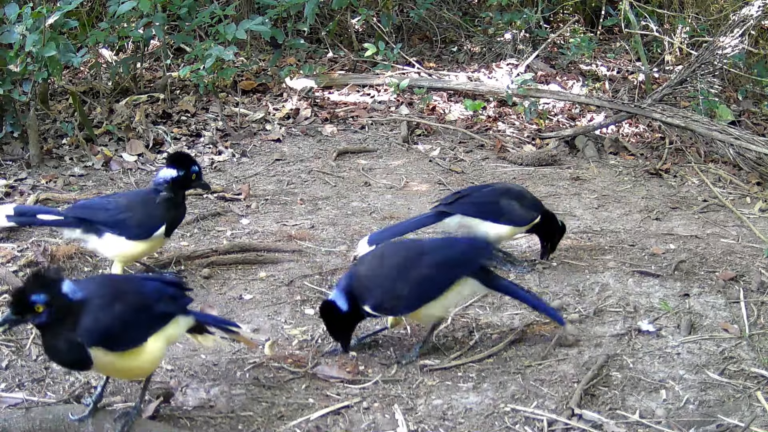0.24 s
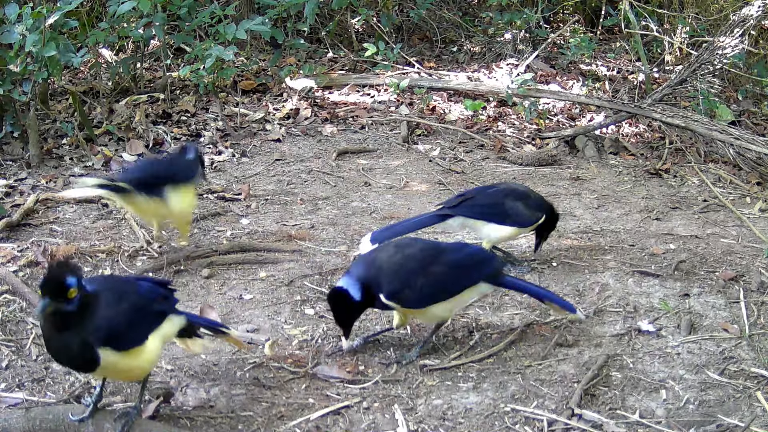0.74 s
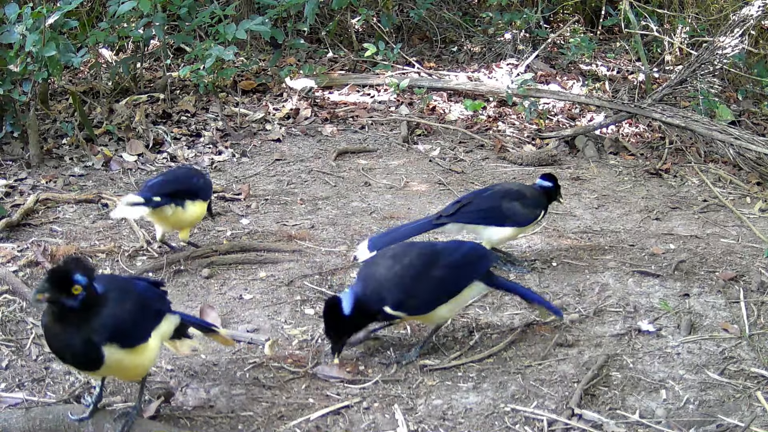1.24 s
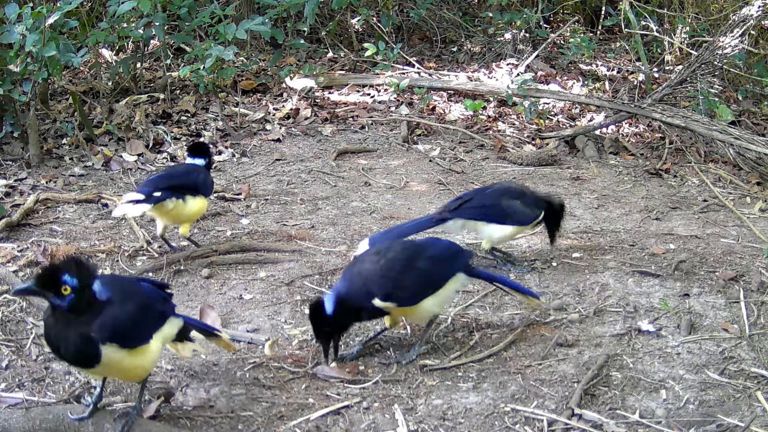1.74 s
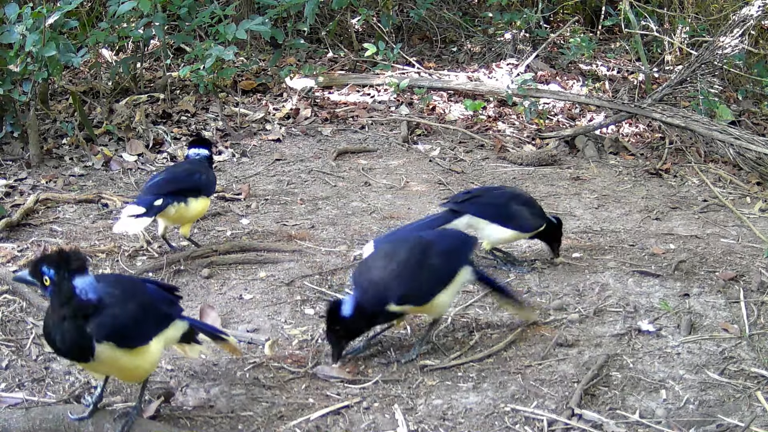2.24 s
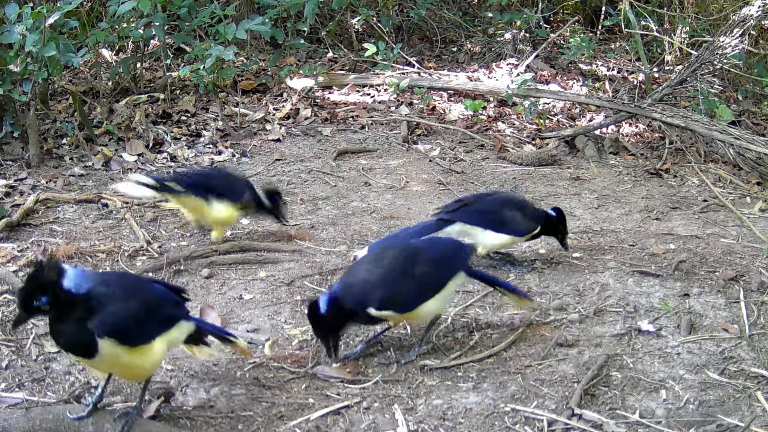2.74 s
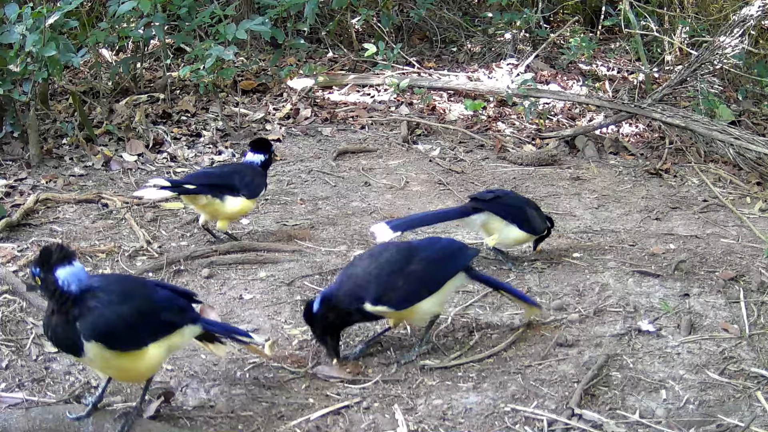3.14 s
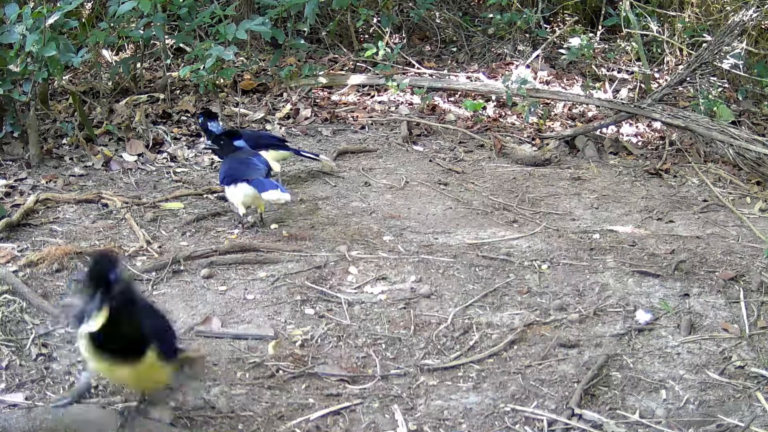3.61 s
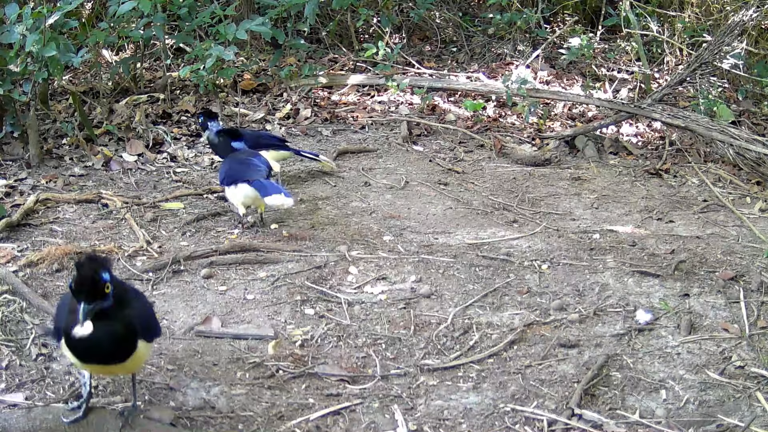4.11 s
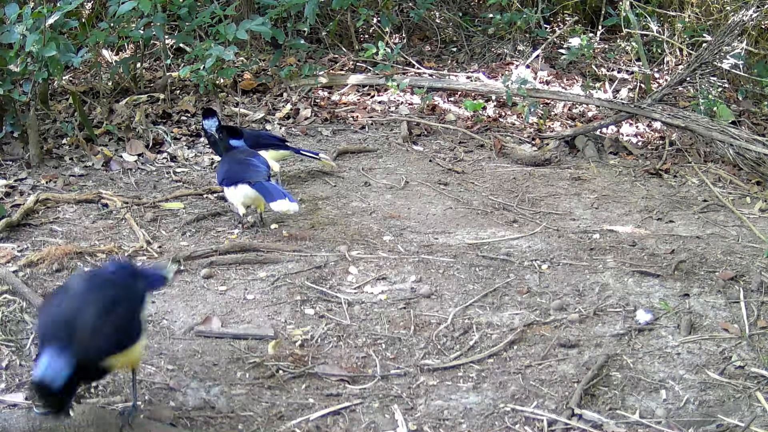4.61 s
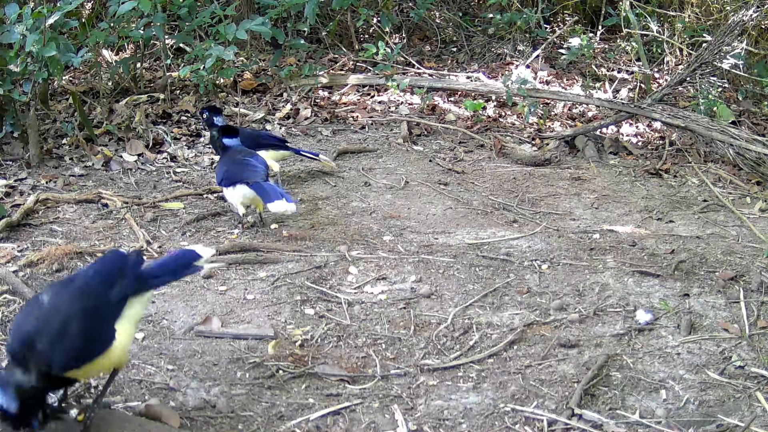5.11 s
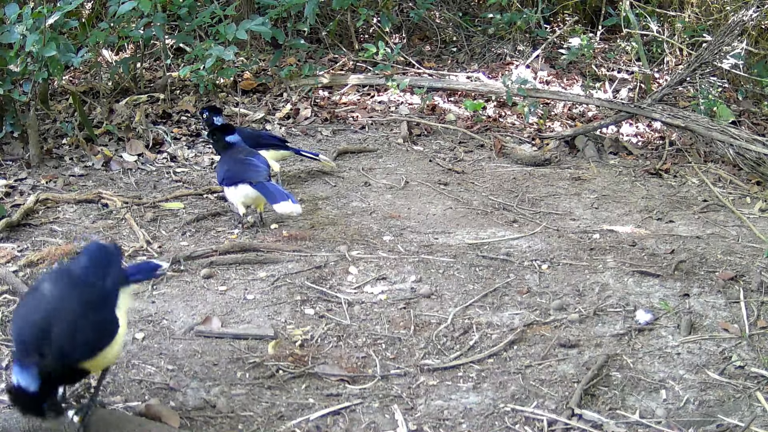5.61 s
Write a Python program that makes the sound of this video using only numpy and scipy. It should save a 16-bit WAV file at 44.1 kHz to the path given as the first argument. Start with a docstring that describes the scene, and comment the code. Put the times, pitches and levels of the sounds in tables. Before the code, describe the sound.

Two brief bursts of abrupt jay chips and downward-sliding notes ring in a quiet wood, with light pecking and leaf rustle between.

```python
"""First a sharp chip, already under way, from a jay close to the microphone, over a low rumble and still
forest air. Each chip is two gliding, coupled voices; the same near perspective has one long falling note.
Further off, behind leaves, a bird gives four stepped falling notes; two pairs of thin whistles are bent tones.
Jays forage on bare ground: noise bursts tick, damped modes knock, and sparse crackles rustle.
A small recorder takes it all at 16 kHz and joins its samples by straight lines."""
import sys
import numpy as np
from scipy import signal
from scipy.fft import rfft, irfft
from scipy.io import wavfile

SR = 44100
rng = np.random.default_rng(int(sys.argv[2]) if len(sys.argv) > 2 else 0)


def transcribe(signal):
    """Save signal, clipped to [-1, 1], as a 16-bit WAV file at the path in sys.argv[1]."""
    frames = np.atleast_2d(signal).T
    limited = np.clip(frames, -1, 1)
    pcm = np.round(limited * 32767).astype(np.int16)
    wavfile.write(sys.argv[1], SR, pcm)


N = 258271

# Chips of the near jay. Each row: start in seconds, time until the dive in seconds, upper voice in Hz,
# its peak in dB, its level in the dive in dB, lower voice in Hz, its peak in dB, its fade before the
# release in dB, relative overtone level in dB, echo off a trunk in dB relative to the chip.
CHIP_CALLS = [(-0.016, 0.02, 2808, -29, -31, 1800, -31.5, 18, 0, -7),
              (0.119, 0.02, 3474, -21, -39, 1772, -25, 9, 1, -25),
              (2.963, 0.022, 3330, -28.5, -34.5, 1820, -32, 15, 4.5, -5),
              (3.075, .0195, 3046, -28.5, -32.5, 1787, -27, 31, 5, -6),
              (3.204, .019, 2932, -29.5, -36.5, 1710, -34, 17, 4, -15)]
# The near falling note. Each row: time in seconds, pitch in Hz, relative level in dB.
NEAR_FALL = [(3.812, 6690, -60.5), (3.816, 4455, -40), (3.82, 3970, -26.5), (3.842, 2736, -18),
             (3.853, 2437, -22), (3.875, 2145, -29.5), (3.909, 1897, -22), (3.926, 1565, -20.5),
             (3.936, 1232, -24.5), (3.953, 1017, -24.5), (3.98, 860, -37.5), (3.99, 530, -48.5),
             (4.0, 330, -54)]
# Distant falling notes. Each row: start in seconds, length in seconds, level in dB, entry pitch in Hz,
# first, second and third step in Hz, relative echo level in dB, extra treble in the echoes in dB.
FAR_FALLS = [(0.611, 0.1312, -37, 4600, 3450, 2300, 1480, -0.87, 12),
             (0.879, 0.13, -37.5, 4605, 3570, 2150, 1422, -.5, 13),
             (3.177, .127, -37.5, 3990, 3450, 2228, 1483, 1, 18),
             (3.45, 0.12, -37.5, 4895, 3004, 2130, 1575, 0, 12.8)]
# Thin whistles, in overlapping pairs. Each row: start in seconds, length in seconds, first pitch in Hz,
# turning pitch in Hz, turn as a share of the length, relative level in dB, growth over the length in dB.
WHISTLE_ARCS = [(0.311, 0.097, 7380, 6400, 0.55, -76, 7), (0.323, 0.068, 6970, 7940, 0.68, -75.5, 19),
                (4.693, 0.079, 7900, 6100, 1, -73.5, -4), (4.708, 0.073, 7250, 7900, 1, -80, -3)]
# Pecks and snapping litter. Each row: start in seconds, relative body level in dB, body centre in Hz,
# relative level of the crisp top in dB.
LITTER_TICKS = [(0.9836, -46, 1430, -61), (1.3096, -53, 1454, -75), (1.3783, -46.5, 1845, -91),
                (1.9333, -47.5, 1590, -70), (2.4895, -46, 2250, -87), (2.6096, -45, 1830, -74),
                (3.6905, -49.5, 1670, -83.5), (4.13, -45, 1881, -71.5), (4.2228, -42, 1712, -62.5),
                (4.5552, -51, 1390, -84), (4.7836, -50.5, 1410, -73), (4.814, -44, 2300, -70.5),
                (4.9004, -53, 1880, -68), (4.9371, -53, 1206, -83.5), (4.9757, -47.5, 2046, -67),
                (5.034, -46.5, 1390, -74), (5.682, -52, 2600, -75)]
# Dull knocks on the ground. Each row: start in seconds, relative level in dB, brightness of the modes
# above 1 kHz in dB, relative scrape level in dB.
GROUND_KNOCKS = [(.881, -46, -17, 1.5), (2.207, -43, 3.5, 2.5)]
# Modes a knock rings with. Each row: frequency in Hz, relative level in dB, time to fall 60 dB in seconds.
GROUND_MODES = [(561, 3.5, 0.043), (940, -16, 0.14), (1210, -1, 0.025), (1820, -43, 0.049),
                (2040, -10, 0.05), (2309, -6, 0.036)]
# Spectrum of the still forest air. Each row: frequency in Hz, relative density in dB per Hz.
AIR_SPECTRUM = [(88, -31), (150, -4), (166, -5.5), (202, 0), (227, -5), (385, -8.5), (536, -10),
                (1070, -14.5), (1220, -14.5), (1440, -16), (1980, -18.5), (3090, -25.5), (4830, -40.5),
                (7800, -31.5), (10100, -68), (17200, -120)]
# Spectrum of the low rumble. Each row: frequency in Hz, relative density in dB per Hz.
RUMBLE_SPECTRUM = [(7.1, -29.5), (12, 5), (30, 0.5), (65, -2), (84, -3), (160, -16.5), (210, -55),
                   (350, -120)]
# Ring of the trees. Each row: frequency in Hz, time to fall 60 dB in seconds.
FOREST_RING = [(400, .4), (1000, 0.27), (1600, 0.65), (2300, 0.59), (3500, 0.46), (5000, 0.66), (8000, 1)]
# How throat and open beak colour overtones and air noise. Each row: frequency in Hz, gain in dB.
THROAT_GAIN = [(1500, -4.5), (2700, 0), (3800, -5.5), (5000, -8), (6300, -3.5), (7100, -3), (7900, 1)]
# The four steps of a distant note, in order. Each entry: level of the step in dB relative to the note.
FALL_STEP_DB = [-15, -2, -1.5, -11.5]

AIR_DB, RUMBLE_DB = -62, -50
# sampling rate of the recorder, and the edge of its output filter
RECORDER_HZ, EDGE_HZ = 16000, 15700
LEAD_S = .02  # room for the chip that starts before time zero

# upper voice of a chip: pitch at the break, floor it dives toward, length and time constant of the dive
BREAK_HZ, FLOOR_HZ, DIVE_S, DIVE_TIME_CONSTANT_S = 2355, 375, 0.022, .0084
SAG_POWER, SWELL_DB, SWELL_POWER = 1.7, 44, 2.52
SOFTEN_S, RELEASE_DB = 0.0091, 20.5
# lower voice of a chip: attack, and the share of its pitch that it loses
LOWER_ATTACK_S, LOWER_SAG = .007, 0.33
# the upper voice is damped while it passes through the pitch of the lower
CROSSING_DB, CROSSING_WIDTH_HZ = 3, 340

# distant notes: travel before the first and after the last step, in steps, and how they linger and dip
STEPS_BEFORE, STEPS_AFTER, SLOWING, LINGER, DIP_DB = .37, .33, .8, 0.48, 13
SETTLE_STEPS, ENTRY_DB = 1.5, -17
LAST_STEP_HZ, EXIT_HZ = 860, 520


def amp(db):
    """Decibels to gain."""
    return 10 ** (np.asarray(db) / 20)


def unit(x):
    """Scales to rms 1."""
    return x / np.sqrt(np.mean(x ** 2) + 1e-20)


def read(points, hz):
    """Reads a table along a log-frequency axis."""
    f, value = np.transpose(points)
    return np.interp(np.log(hz + 1), np.log(f), value)


def add(mix, s, sound):
    """Adds a sound to the mix at time s, or at the start if s is negative."""
    part = mix[max(round(s * SR), 0):][:len(sound)]
    part += sound[:len(part)]


def play(sounds):
    """Lays (start, sound) pairs on one track."""
    track = np.zeros(N)
    for start, sound in sounds:
        add(track, start, sound)
    return track


def shaped_noise(size, gain):
    """White noise filtered by a gain for each frequency bin, at rms 1."""
    return unit(irfft(rfft(rng.standard_normal(size)) * gain, size))


def band_noise(size, hz, width_hz):
    """Noise of rms 1 in a bell-shaped band; around 0 Hz it is a slow random waver."""
    f = np.fft.rfftfreq(size, 1 / SR)
    return shaped_noise(size, np.exp(-((f - hz) / width_hz) ** 2))


def air_noise(size):
    """Turbulence in the syrinx, coloured by the throat."""
    hz = np.fft.rfftfreq(size, 1 / SR)
    return shaped_noise(size, amp(read(THROAT_GAIN, hz)) * (hz < RECORDER_HZ / 2))


def voice(hz, db, jitter, flutter_db):
    """One vibrating side of the syrinx: its phase and its slightly unsteady strength."""
    size = len(hz)
    unsteady_hz = hz * (1 + jitter * band_noise(size, 0, 500))
    phase = 2 * np.pi * np.cumsum(unsteady_hz) / SR
    strength = amp(db + flutter_db * band_noise(size, 0, 189))
    # about 1 ms of fade at each end
    return phase, strength * signal.windows.tukey(size, min(0.00223 * SR / size, 1))


def upper_voice(t, hold_s, top_hz, peak_db, dive_db):
    """Pitch and level of a chip's upper voice: it swells and sags, then breaks into a softer dive."""
    held, diving_s = np.minimum(t / hold_s, 1), np.maximum(t - hold_s, 0)
    sagging_hz = top_hz + (BREAK_HZ - top_hz) * held ** SAG_POWER
    hz = FLOOR_HZ + (sagging_hz - FLOOR_HZ) * np.exp(-diving_s / DIVE_TIME_CONSTANT_S)
    sustain_db = dive_db + (peak_db - dive_db) * np.exp(-(diving_s / SOFTEN_S) ** 2)
    swell_db = -SWELL_DB * (1 - held) ** SWELL_POWER
    release_db = -RELEASE_DB * (diving_s / DIVE_S) ** 3
    return hz, sustain_db + swell_db + release_db


def lower_voice(t, top_hz, peak_db, fade_db):
    """Pitch and level of a chip's lower voice: a quick attack, then both droop."""
    droop = (t / t[-1]) ** 2
    attack_db = 20 * np.log10(np.clip(t / LOWER_ATTACK_S, 1e-3, 1))
    level_db = peak_db + attack_db - fade_db * droop - RELEASE_DB * droop ** 4
    return top_hz * (1 - LOWER_SAG * droop), level_db


def chip(row, sum_db=-20, cubic_db=-21, octave_db=-24, flare_db=-2, rasp_db=-10):
    """The upper voice dives through the lower; their coupling makes sum tones, and the dive ends in a rasp."""
    start, hold_s, top_hz, top_db, dive_db, low_hz, low_db, fade_db, edge_db = row
    t = np.arange(0, hold_s + DIVE_S, 1 / SR)
    upper_hz, upper_db = upper_voice(t, hold_s, top_hz, top_db, dive_db)
    lower_hz, lower_db = lower_voice(t, low_hz, low_db, fade_db)
    damping_db = CROSSING_DB * np.exp(-((upper_hz - lower_hz) / CROSSING_WIDTH_HZ) ** 2)
    upper_phase, upper = voice(upper_hz, upper_db - damping_db, jitter=0.009, flutter_db=1.9)
    lower_phase, lower = voice(lower_hz, lower_db, jitter=0.0087, flutter_db=2.0)

    def partial(m, n):
        """An overtone combining m cycles of the upper voice with n of the lower."""
        gain = amp(read(THROAT_GAIN, m * upper_hz + n * lower_hz))
        return gain * np.sin(m * upper_phase + n * lower_phase)

    def resonance(hz):
        """Gain of the main throat resonance."""
        return amp(flare_db) * np.exp(-((hz - 2700) / 380) ** 2)

    higher = partial(1, 2) + amp(-4) * partial(2, 1) + amp(-9) * partial(2, 2)
    coupled = np.sqrt(upper * lower) * (amp(sum_db) * partial(1, 1) + amp(cubic_db) * higher)
    octaves = amp(octave_db) * (upper * partial(2, 0) + .5 * lower * partial(0, 2))
    # as the pitch sinks, overtones pass through the resonance and flare
    flare = 0
    for k in range(2, 5):
        flare = flare + resonance(k * lower_hz) * lower * np.sin(k * lower_phase)
        flare = flare + resonance(k * upper_hz) * upper * np.sin(k * upper_phase) / k
    air = amp(-29) * (upper + .25 * lower) * air_noise(len(t))
    # the rasp comes in as the upper voice sinks from 2000 to 1200 Hz
    rasp_gate = np.clip((2000 - upper_hz) / 800, 0, 1)
    rasp = amp(rasp_db) * upper * rasp_gate * band_noise(len(t), 1320, 990)
    tones = upper * np.sin(upper_phase) + lower * np.sin(lower_phase)
    return start, tones + amp(edge_db) * (coupled + octaves) + flare + air + rasp


def trunk_echo(x, echo_db, delay_s=0.0165, bark_hz=1100):
    """A trunk a few metres off returns one distinct echo, dulled by its rough bark."""
    dull = signal.sosfilt(signal.butter(2, bark_hz, fs=SR, output="sos"), x)
    return x + amp(echo_db) * play([(delay_s, dull)])


def afterring(x, hz=2690, width_hz=60, ring_db=-5):
    """A narrow band lingers after each chip, made by a resonant filter."""
    return x + amp(ring_db) * signal.lfilter(*signal.iirpeak(hz, hz / width_hz, SR), x)


def forest(x, early_db, early_t60, late_db, bright_db=0):
    """Ground and nearby stems scatter a quick cluster of echoes; the trees leave a long faint tail.
    A bird that faces away beams its treble into the trees: bright_db lifts the treble of its echoes."""
    t = np.arange(SR) / SR
    # sparse random reflections, none within the first 2 ms
    taps = rng.standard_normal((2, SR)) * (rng.random((2, SR)) < 2500 / SR) * (t > .002)
    early = taps[0] * amp(-60 * t / early_t60)
    # the tail builds up over 22 ms, then each frequency dies at its own rate
    hz, at, z = signal.stft(taps[1] * np.minimum(t / 0.022, 1), SR, nperseg=256)
    decay = amp(-60 * at / read(FOREST_RING, hz)[:, None])
    late = signal.istft(z * decay, SR, nperseg=256)[1][:SR]
    echoes = amp(early_db) * early / np.linalg.norm(early) + amp(late_db) * late / np.linalg.norm(late)
    treble = np.clip((np.fft.rfftfreq(2 * SR, 1 / SR) - 1000) / 3500, 0, 1)
    echoes = irfft(rfft(echoes, 2 * SR) * amp(bright_db * treble))[:SR]
    return x + signal.fftconvolve(x, echoes)[:N]


def near_chips():
    """The first chip is already under way at time zero, so the chips are played from a little earlier."""
    dry = np.zeros(N)
    for *shape, echo_db in CHIP_CALLS:
        start, sound = chip(shape)
        dry += trunk_echo(play([(start + LEAD_S, sound)]), echo_db)
    wet = forest(afterring(dry), early_db=-12.5, early_t60=0.14, late_db=-28.5, bright_db=5.5)
    lead = round(LEAD_S * SR)
    return np.pad(wet[lead:], (0, lead))


def steady(spectrum, db, swell_db):
    """Coloured noise that swells slowly, for the rumble and the forest air."""
    hz = np.fft.rfftfreq(N, 1 / SR)
    noise = shaped_noise(N, amp(read(spectrum, hz)))
    return noise * amp(db + swell_db * band_noise(N, 0, 2.2))


def rustle(per_s=90, level_db=-78):
    """Feet stir dry leaves: sparse faint crackles, each a noise burst with a 2 ms decay."""
    sizes = amp(3.4 * np.minimum(rng.exponential(1, N), 3)) * (rng.random(N) < per_s / SR)
    bursts = signal.lfilter([1], [1, -np.exp(-1 / (0.00218 * SR))], sizes)
    leaf_noise = band_noise(N, 2200, 1400) + amp(-12.5) * band_noise(N, 7090, 2000)
    return amp(level_db) * unit(bursts * leaf_noise)


def note(glide, jitter, flutter_db, level_db=0, second_db=-80, third_db=-80, upper_db=-80, air_db=-80):
    """A gliding, almost pure tone with a little air noise; the octave flares as it crosses a throat
    resonance, and odd overtones come in once the pitch is low."""
    start, hz, db = glide
    phase, strength = voice(hz, db, jitter, flutter_db)

    def partial(k):
        """Overtone k, coloured by the throat, left out above half the recorder's rate."""
        return amp(read(THROAT_GAIN, k * hz)) * (k * hz < RECORDER_HZ / 2) * np.sin(k * phase)

    octave = amp(second_db) * (.2 + np.exp(-((2 * hz - 3550) / 750) ** 2)) * partial(2)
    # opens as the pitch falls through 2350 Hz
    low_gate = 1 / (1 + np.exp(np.minimum((hz - 2350) / 80, 20)))
    odd = amp(third_db) * partial(3) + amp(upper_db) * (partial(7) + partial(9))
    tone = np.sin(phase) + octave + low_gate * odd + amp(air_db) * air_noise(len(hz))
    return start, amp(level_db) * strength * tone


def arc(start, length, first_hz, turn_hz, turn_at, level_db, growth_db):
    """Start, pitch and level of a whistle that bends along one parabola."""
    u = np.arange(0, length, 1 / SR) / length
    hz = turn_hz + (first_hz - turn_hz) * (1 - u / turn_at) ** 2
    return start, hz, level_db + growth_db * (u - .5)


def thin_whistles():
    """Overlapping bent pure tones, with strong scattered echoes."""
    dry = play(note(arc(*row), level_db=8.5, jitter=0.0046, flutter_db=3.5) for row in WHISTLE_ARCS)
    return forest(dry, early_db=3, early_t60=0.26, late_db=-14.0)


def stepped_fall(start, length, level_db, entry_hz, first_hz, second_hz, third_hz):
    """Start, pitch and level of a note that slides down four steps, dipping between them."""
    u = np.arange(0, length, 1 / SR) / length
    steps_hz = [entry_hz, first_hz, second_hz, third_hz, LAST_STEP_HZ, EXIT_HZ]
    places = np.r_[-STEPS_BEFORE, np.arange(len(steps_hz) - 1)]
    # position along the stair: 0 is the first step
    travel = STEPS_BEFORE + len(FALL_STEP_DB) - 1 + STEPS_AFTER
    step = travel * u ** SLOWING - STEPS_BEFORE
    settled = np.clip(step / SETTLE_STEPS, 0, 1)
    # the pitch lingers near each whole step
    stair = step - settled * LINGER * np.sin(2 * np.pi * step) / (2 * np.pi)
    hz = np.exp(np.interp(stair, places, np.log(steps_hz)))
    step_db = np.interp(step, np.arange(len(FALL_STEP_DB)), FALL_STEP_DB)
    attack_db = ENTRY_DB * np.maximum(-step / STEPS_BEFORE, 0)
    dips_db = settled * DIP_DB * np.sin(np.pi * step) ** 2
    return start, hz, level_db + step_db + attack_db - dips_db


def far_jay(leaves_hz=3200):
    """Leaves dull the straight path of the distant notes, so their treble arrives mostly by way of the trees."""
    leaves = signal.butter(2, leaves_hz, fs=SR, output="sos")
    total = np.zeros(N)
    for *shape, echo_db, bright_db in FAR_FALLS:
        call = note(stepped_fall(*shape), jitter=0.012, flutter_db=2.5,
                    second_db=-16.5, third_db=-32.5, air_db=-48.5)
        dry = play([call])
        wet = forest(dry, early_db=echo_db - 6.5, early_t60=.22, late_db=echo_db - 11, bright_db=bright_db)
        echoes = wet - dry
        total += signal.sosfilt(leaves, dry) + echoes
    return total


def knock(row):
    """A blow on the ground rings a few short modes and scrapes the grit."""
    s, db, bright_db, scrape_db = row
    t = np.arange(SR // 8) / SR
    ring = np.zeros(len(t))
    for hz, level_db, t60 in GROUND_MODES:
        ring += amp(level_db + bright_db * (hz > 1000) - 60 * t / t60) * np.sin(2 * np.pi * hz * t)
    scrape = band_noise(len(t), 1630, 1040)
    scrape += amp(5.5) * band_noise(len(t), 810, 310)
    scrape += amp(-16) * band_noise(len(t), 7000, 1500)
    return s, amp(db - 4.5) * (ring + amp(scrape_db - 7.0 - 60 * t / 0.039) * scrape)


def tick(row, body_db=-4, top_db=3.5, t60=.024):
    """A burst of tiny fractures, as decaying noise: a woody body and a crisp top."""
    s, db, hz, crisp_db = row
    t = np.arange(SR // 10) / SR
    body = amp(db + body_db) * band_noise(len(t), hz, 1200)
    top = amp(crisp_db + top_db) * band_noise(len(t), 7130, 2500)
    return s, (body + top) * amp(-60 * t / t60)


def foraging():
    """Beaks and feet on the ground, with short echoes close by."""
    knocks = play(knock(row) for row in GROUND_KNOCKS)
    ticks = play(tick(row) for row in LITTER_TICKS)
    return forest(knocks + ticks + rustle(), early_db=-8.5, early_t60=0.075, late_db=-19.5)


def curves(rows):
    """Joins the rows of a call by straight lines: start time, then one curve a column."""
    s, *columns = np.transpose(rows)
    t = np.arange(s[0], s[-1], 1 / SR)
    return [s[0]] + [np.interp(t, s, c) for c in columns]


def near_fall():
    """One long glide down, close by, gaining odd overtones as its pitch sinks."""
    call = note(curves(NEAR_FALL), level_db=1.5, jitter=0.002, flutter_db=1.83,
                second_db=-18, third_db=-23.5, upper_db=-28, air_db=-39.5)
    return forest(play([call]), early_db=-12, early_t60=0.12, late_db=-25, bright_db=-0.5)


def scene():
    """Near calls have weak echoes and the far jay and whistles stronger ones, over rumble and air."""
    mix = near_chips()
    mix += steady(RUMBLE_SPECTRUM, RUMBLE_DB, swell_db=0.55)
    mix += steady(AIR_SPECTRUM, AIR_DB, swell_db=-1.32)
    mix += thin_whistles()
    mix += far_jay()
    mix += foraging()
    mix += near_fall()
    # a fade under 1 ms at each end
    return mix[None] * signal.windows.tukey(N, 0.0013 * SR / N)


def record(dry):
    """Samples at 16 kHz and joins the samples by straight lines, which mirrors every sound faintly about 8 kHz."""
    x = np.pad(dry[0], (0, -N % SR))
    size = len(x) * RECORDER_HZ // SR
    # fade out the last 150 Hz below half the recorder's rate
    guard = np.clip((RECORDER_HZ / 2 - np.fft.rfftfreq(len(x), 1 / SR)) / 150, 0, 1)
    samples = irfft(rfft(x) * guard, size) * RECORDER_HZ / SR
    # draw the lines at twice the output rate, filter, then keep every other point
    joined = np.interp(np.arange(2 * N) / (2 * SR), np.arange(size) / RECORDER_HZ, samples)
    low_pass = signal.firwin(1023, EDGE_HZ, window=("kaiser", 9), fs=2 * SR)
    return signal.oaconvolve(joined, low_pass, "same")[None, ::2]


dry = scene()
out = record(dry)
transcribe(out)
```